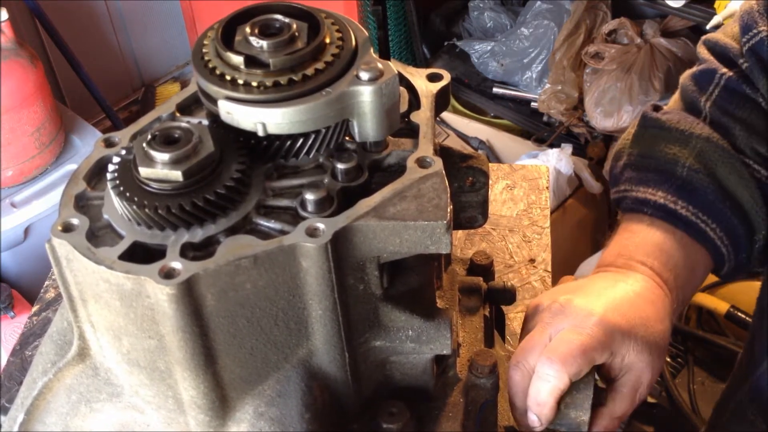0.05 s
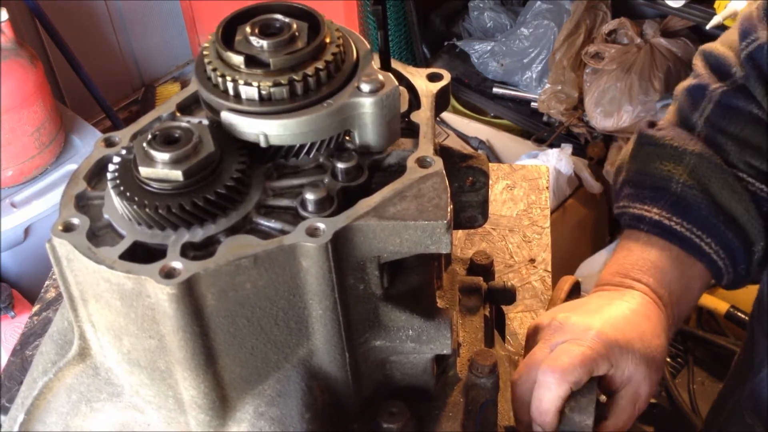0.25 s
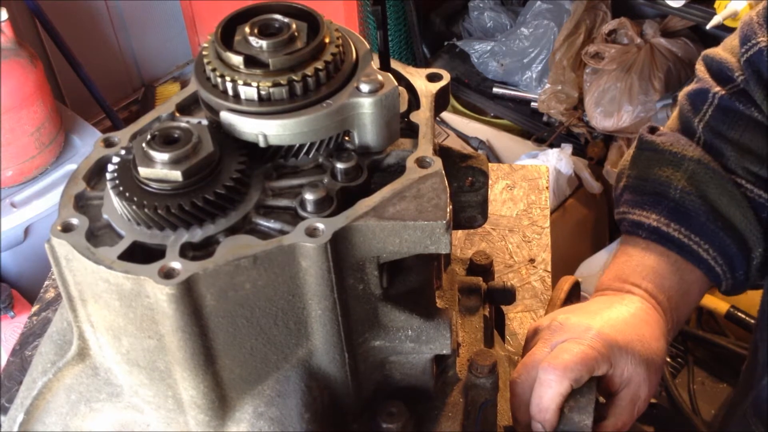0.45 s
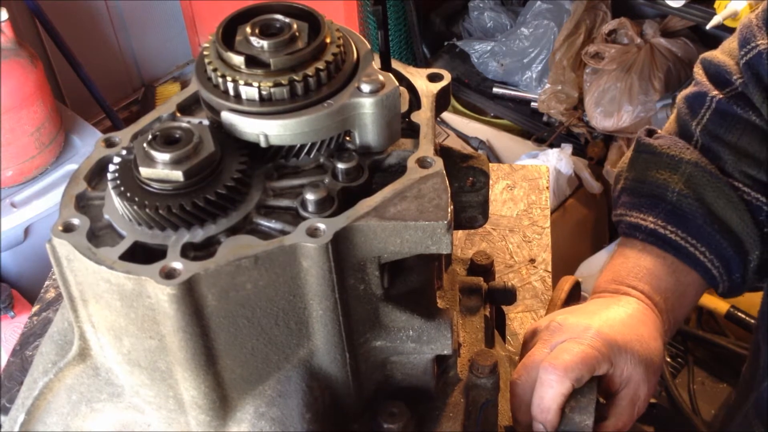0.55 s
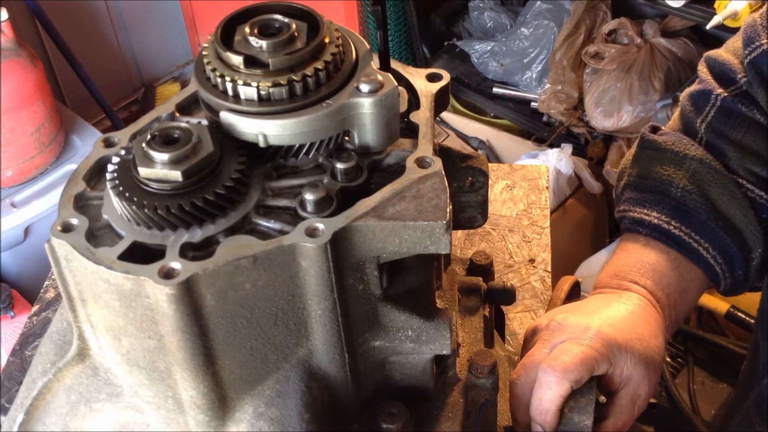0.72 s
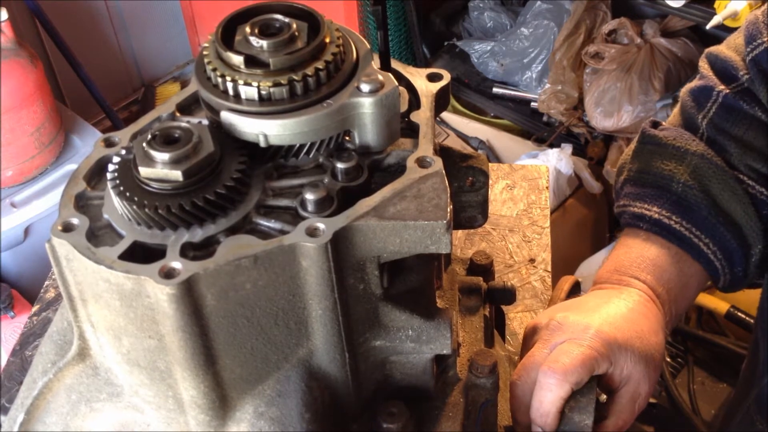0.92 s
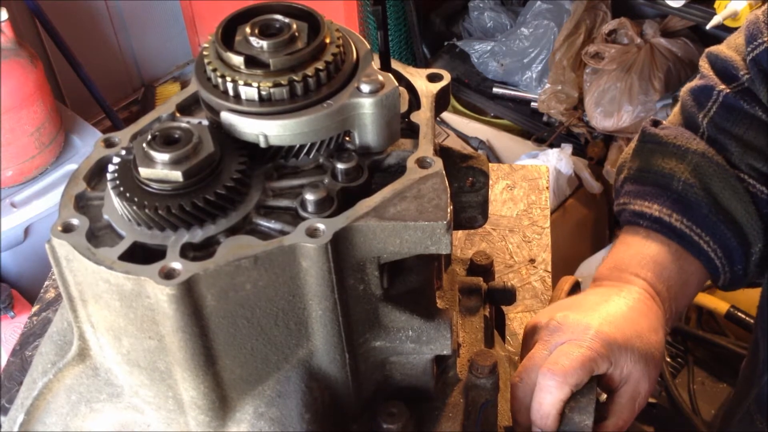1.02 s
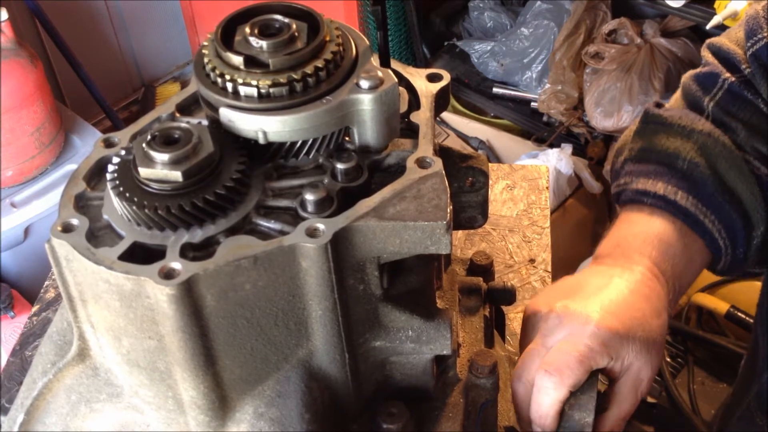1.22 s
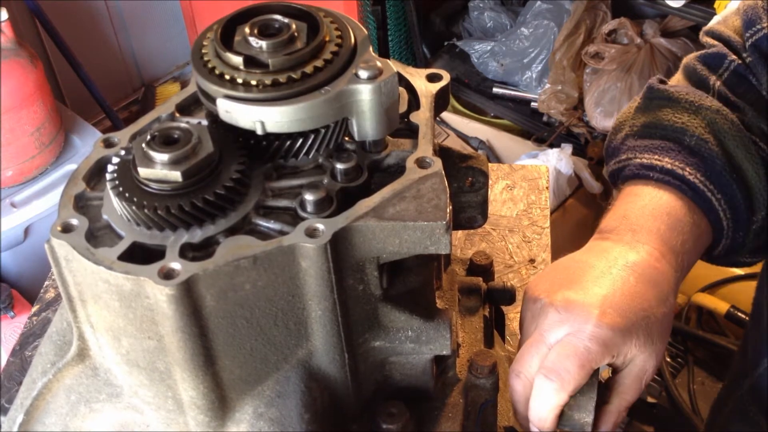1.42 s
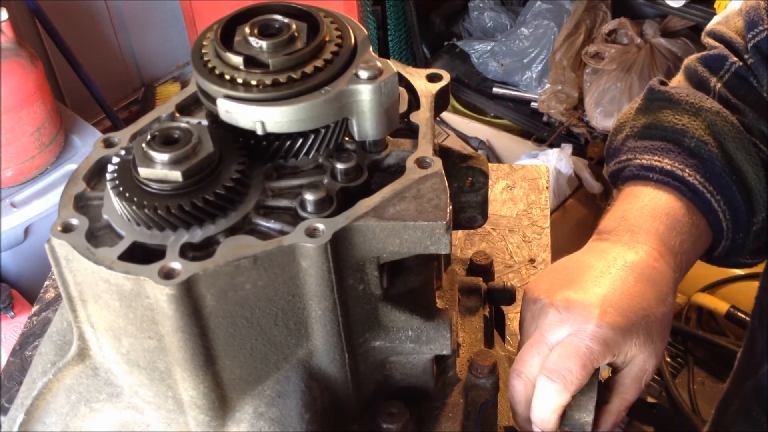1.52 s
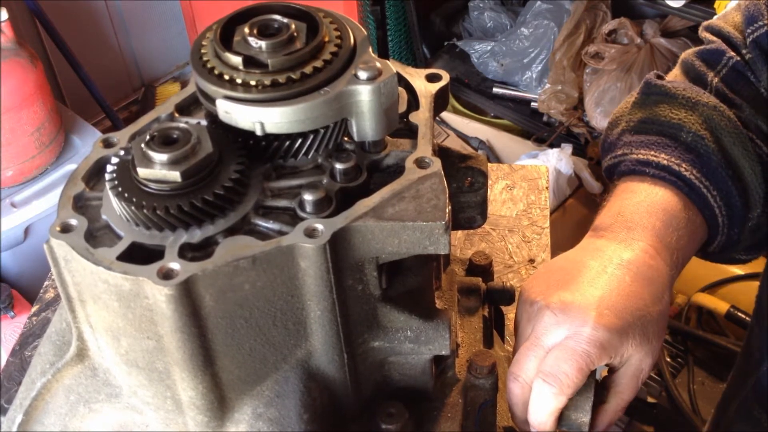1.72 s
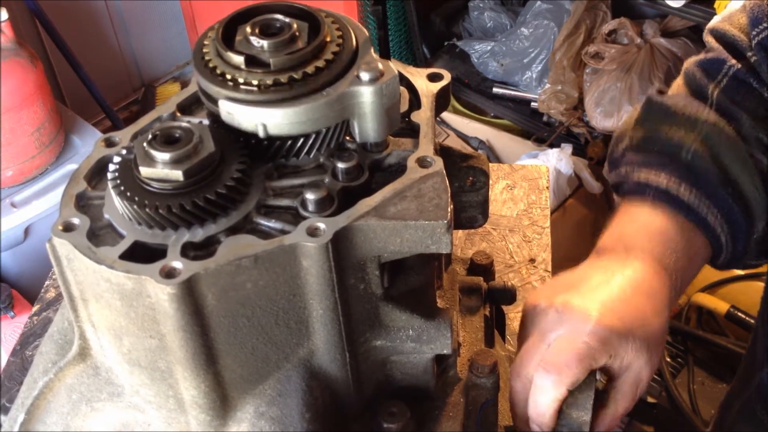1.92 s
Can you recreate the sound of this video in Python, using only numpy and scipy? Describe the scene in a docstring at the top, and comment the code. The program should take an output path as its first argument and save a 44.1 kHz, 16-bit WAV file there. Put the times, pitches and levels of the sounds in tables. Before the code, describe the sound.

Loud hard metal clunk of a gear shift on a workbench, followed by lighter clicks and knocks

```python
"""A manual gearbox stands open on a workbench in a small garage, over a low room rumble, and is shifted by hand.
First the selector clicks over its detent and slams into gear, ringing the alloy case and thumping the bench.
Loose parts then knock lightly; a second after the slam it clicks back out with a softer clunk, and more follow.
Each knock is a set of dying noise bands plus ringing sines; sliding and room sound are steady filtered noise."""
import sys
import numpy as np
from scipy import signal
from scipy.io import wavfile

SR = 44100
rng = np.random.default_rng(int(sys.argv[2]) if len(sys.argv) > 2 else 0)


def wav_out(sig):
    """Save sig, one row per channel (or a flat mono array), as 16-bit PCM at SR to the path in sys.argv[1]."""
    wavfile.write(sys.argv[1], SR, np.round(np.clip(np.atleast_2d(sig).T, -1, 1) * 32767).astype(np.int16))


N = 85995
TIME = np.arange(N) / SR  # s
EDGES = np.geomspace(22, 17000, 34)  # borders of the noise bands, Hz
CENTRES = np.sqrt(EDGES[1:] * EDGES[:-1])
LN_60_DB = np.log(1e6)  # a 60 dB fall lasts this many time constants of the power

# metal contacts: t/s, bench thud level/dB, case clank level/dB, steel click level/dB,
# crack level over the ring/dB, brightness slope/(dB per octave)
CONTACTS = [(.002, -55, -68, -70, -8, 1), (0.0209, -61.5, -52, -63.5, 8, -2.5),
            (0.109, -62.5, -80, -85, 2, -17), (.2035, -62, -60, -53, 0, -1),
            (0.2061, -40, -39, -34, 0.5, -2.5), (0.2163, -38.5, -46, -41, 12.5, -3),
            (0.2283, -41.5, -40.5, -36.5, 0, 12), (0.2407, -45.5, -19, -23.5, 8, 2.5),
            (0.559, -61, -73, -83.5, -12, -10), (1.092, -60, -53.5, -64.5, 0.5, 2),
            (1.103, -57, -61, -79.5, -6, -4.5), (1.2509, -74.5, -61, -37, 11.5, 6.5),
            (1.2677, -66, -49.5, -33.5, -4, 0), (1.305, -52.5, -40, -48, 6.5, -1),
            (1.341, -54.5, -51.5, -75, 8, -6), (1.629, -72, -68, -80.5, -6, -8),
            (1.643, -58.5, -59.5, -66, 4, -3.5), (1.869, -64, -66.5, -84.5, -9, -1),
            (1.8938, -65.5, -61.5, -80, 8.5, -4.5), (1.9375, -51, -48, -44.5, 1, -4.5)]
# how long the dense ringing takes to fall by 60 dB: f/Hz, t60/s
RING_T60 = [(100, 0.5), (250, .5), (500, .32), (1000, 0.23), (2200, 0.18), (4000, .175), (8000, .15),
            (14000, 0.16)]


def from_db(db):
    """Turn decibels into a gain."""
    return 10 ** (np.asarray(db) / 20)


def at_hz(points, hz):
    """Read a table between its points, on a log-frequency axis."""
    f, v = np.transpose(points)
    return np.interp(np.log(hz), np.log(f), v)


def band_noise(low, high):
    """Noise between two frequencies in Hz, with an rms of 1."""
    band = signal.butter(2, [low, high], "band", fs=SR, output="sos")
    # the first half second lets the filter settle and is dropped
    x = signal.sosfilt(band, rng.standard_normal(N + SR // 2))[-N:]
    return x / x.std()


def shares(spectrum, tilt_db=0):
    """Share of a spectrum's power in each band, one column for each tilt in dB per octave."""
    db = at_hz(spectrum, CENTRES)[:, None] + np.outer(np.log2(CENTRES), tilt_db)
    power = from_db(db) ** 2 * np.diff(EDGES)[:, None]
    return power / power.sum(axis=0)


def clicks(times, sizes):
    """Place single-sample impulses at the given times."""
    out = np.zeros(N)
    places = np.clip(np.asarray(times) * SR, 0, N - 1).astype(int)
    np.add.at(out, places, sizes)
    return out + 1e-18  # never exactly zero


def fade(x, seconds):
    """Each impulse jumps up and dies away exponentially, to 1/e in the given time."""
    return signal.lfilter([1], [1, -np.exp(-1 / (seconds * SR))], x)


def ring(x, hz, t60):
    """A unit impulse sets a sine ringing from height 1; it falls by 60 dB in t60 seconds."""
    r = 1000 ** (-1 / (t60 * SR))
    w = 2 * np.pi * hz / SR
    return signal.lfilter([0, np.sin(w)], [1, -2 * r * np.cos(w), r * r], x)


def linger(power, life, hz):
    """Energy dies quickly in the metal and leaves a faint, longer and duller tail in the garage."""
    garage_tail_db, garage_t60_s = -32, 0.46
    air_loss_hz = 5000  # the tail is dull above this
    tail = from_db(garage_tail_db) ** 2 / (1 + (hz / air_loss_hz) ** 2)
    return fade(power, life) + tail * fade(power, garage_t60_s / LN_60_DB)


def body(modes, times, level_db):
    """Every contact strikes each mode (f, level, t60) of a solid body with a slightly different strength."""
    strike_spread_db = 0.5
    unevenness_db = strike_spread_db * rng.standard_normal((len(modes), len(times)))
    strengths = from_db(level_db + unevenness_db)
    out = 0
    for k, (hz, db, t60) in enumerate(modes):
        direction = (-1) ** k  # neighbouring modes start in opposite directions
        out = out + direction * from_db(db) * ring(clicks(times, strengths[k]), hz, t60)
    return out


def background():
    """Low rumble and thin hiss of the garage: bands of noise whose common level drifts."""
    room_tone_db = -64
    # colour of the room sound: f/Hz, level/(dB per Hz)
    room_tone = [(15, -66.5), (25, -44), (64, -30.5), (125, 0), (271, -2.5), (354, -2), (588, -10.5),
                 (673, -12), (1540, -16), (2500, -19), (3090, -19.5), (10000, -27), (15000, -24.5)]
    # drift of the background: t/s, level/dB
    handling = [(0, 4.5), (.2, 1.5), (.45, -2), (1.05, -3), (1.25, 1), (1.6, -1.5), (1.95, -1)]
    tone = 0
    for low, high, power in zip(EDGES, EDGES[1:], shares(room_tone)):
        tone = tone + np.sqrt(power) * band_noise(low, high)
    return tone * from_db(room_tone_db + np.interp(TIME, *np.transpose(handling)))


def shaft():
    """Oiled steel sliding gives a faint narrow hiss that swells and fades."""
    half_width_hz = 370
    # the shaft slides: middle t/s, half length/s, f/Hz, level/dB
    shaft_rubs = [(0.579, .03, 4114, -75.5), (1.446, .015, 6154, -77.5), (1.722, 0.063, 6100, -77)]
    out = 0
    for middle, half, hz, db in shaft_rubs:
        swell = np.exp(-((TIME - middle) / half) ** 2)
        out = out + from_db(db) * swell * band_noise(hz - half_width_hz, hz + half_width_hz)
    return out


def bench():
    """Each contact thumps the bench, which hums on at its own low notes."""
    # modes of the bench: f/Hz, level/dB, t60/s
    bench_modes = [(156, -5, 0.47), (200.7, -2.5, .7)]
    times, thud_db, *_ = np.transpose(CONTACTS)
    return body(bench_modes, times, thud_db)


def pings():
    """Detent, fork and sleeve ring for an instant, then a short noisy after-ring around their pitch lingers in
    the garage."""
    rise_s = 0.00046  # time constant of the soft start
    after_ring_db = -5
    spread = .17  # the after-ring covers this share of the pitch
    # single parts that ring briefly as they snap home: t/s, f/Hz, level/dB, t60/s
    snaps = [(.2168, 9630, -5, 0.0044), (.2288, 11260, -10, 0.0076), (.229, 12600, -22, 0.029),
             (.242, 2120, 2, 0.017), (.2418, 3310, -11.5, .014), (0.2427, 4866, -14, 0.012),
             (.2418, 9950, -13, 0.0091), (1.2512, 7510, -11.5, 0.0068), (1.2595, 2050, -43.5, 0.011),
             (1.2677, 9440, -16, 0.011), (1.2678, 13140, -21.5, 0.025), (1.2875, 6550, -26.5, 0.018),
             (1.3035, 2477, -32, 0.024), (1.3055, 778, -41.5, 0.2), (1.3055, 972, -44, 0.16),
             (1.629, 3880, -56.5, 0.011), (1.645, 2903, -49.5, .02), (1.8926, 2105, -43, .01),
             (1.9376, 6150, -34, 0.016), (1.9366, 7900, -43, 0.013)]
    out = 0
    for t, hz, db, t60 in snaps:
        blow = clicks([t], from_db(db))
        # taking away a very short ring softens the start
        ping = ring(blow, hz, t60) - ring(blow, hz, rise_s * np.log(1000))
        life = at_hz(RING_T60, hz) / LN_60_DB
        after_power = linger(ping ** 2, life, hz) / (life * SR)
        nearby = band_noise(hz * (1 - spread / 2), hz * (1 + spread / 2))
        out = out + ping + from_db(after_ring_db) * np.sqrt(after_power) * nearby
    return out


def case():
    """Each contact rings the clear notes of the alloy case."""
    case_db = -7  # against the dense ringing
    # modes of the alloy case: f/Hz, level/dB, t60/s
    case_modes = [(572, -14, 0.32), (1110, -6.5, .16), (1408, -7, .17), (1941, -5, 0.16), (2035, -1.5, .2),
                  (2213, -2.5, 0.14), (2352, -5, 0.21), (2543, -4.5, .18), (2660, -7, .16), (2867, -6, .14),
                  (3036, -8.5, .15), (3356, -7, 0.066), (3552, -7.5, .15), (3725, -8, .15)]
    times, _, clank_db, *_ = np.transpose(CONTACTS)
    return body(case_modes, times, clank_db + case_db)


def clatter():
    """Each contact cracks, then the crowded modes of gears, case and garage die away as noise bands."""
    crack_s = 0.0011  # time constant of the first crack
    crack_low_hz = 699.6  # the crack has little below this
    build_cycles = .7  # low notes take about this many cycles to build
    # colour of the bench thud: f/Hz, level/(dB per Hz)
    thud_colour = [(25, -41), (60, -27), (110, -8), (170, 5.5), (260, -9.5), (400, -5), (800, -12),
                   (2000, -46)]
    # colour of the case clank: f/Hz, level/(dB per Hz)
    clank_colour = [(40, -54.5), (130, -29.5), (350, -8.5), (550, -6.5), (800, -5.5), (1150, 0), (1600, -3),
                    (2400, -2), (3300, -3.5), (4200, -13.5), (7000, -21), (15000, -37.5)]
    # colour of the steel click: f/Hz, level/(dB per Hz)
    click_colour = [(500, -29), (2500, -9.5), (4300, -11), (5200, -2), (7200, 4), (8500, -4.5),
                    (9700, -3.5), (12000, -4.5), (13200, -1.5), (15000, -19.5)]

    times, thud_db, clank_db, click_db, crack_db, tilt_db = np.transpose(CONTACTS)
    thuds = shares(thud_colour) * from_db(thud_db) ** 2
    clanks = shares(clank_colour, tilt_db) * from_db(clank_db) ** 2
    steel = shares(click_colour, tilt_db) * from_db(click_db) ** 2
    metals = clanks + steel
    out = 0
    # one row per band, one column per contact
    for low, high, hz, thud, metal in zip(EDGES, EDGES[1:], CENTRES, thuds, metals):
        blows = clicks(times, metal + thud)
        life = at_hz(RING_T60, hz) / LN_60_DB
        build_s = min(build_cycles / hz, life / 2)
        ringing = linger(blows, life, hz) - fade(blows, build_s)
        crack = fade(clicks(times, metal * from_db(crack_db) ** 2), crack_s)
        power = ringing + crack / (1 + (crack_low_hz / hz) ** 4)
        out = out + np.sqrt(np.abs(power)) * band_noise(low, high)
    return out


def scene():
    """Add up garage, bench and gearbox into one channel."""
    return (background() + shaft() + bench() + pings() + case() + clatter())[None]


def record(dry):
    """Peaks are rounded, the deep bass and the top are cut."""
    low_cut_hz, high_cut_hz = 81, 15500
    rounded = 2 * np.tanh(dry / 2)
    bass_cut = signal.butter(2, low_cut_hz, "high", fs=SR, output="sos")
    top_cut = signal.cheby1(12, .3, high_cut_hz, fs=SR, output="sos")
    return signal.sosfilt(top_cut, signal.sosfilt(bass_cut, rounded))


dry = scene()
out = record(dry)
wav_out(out)
```